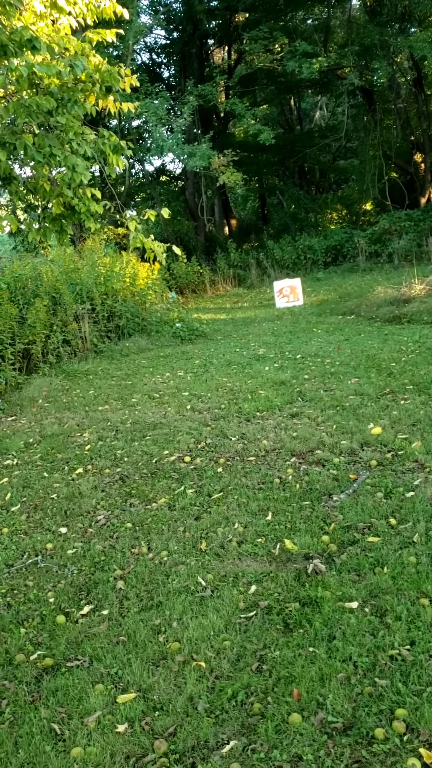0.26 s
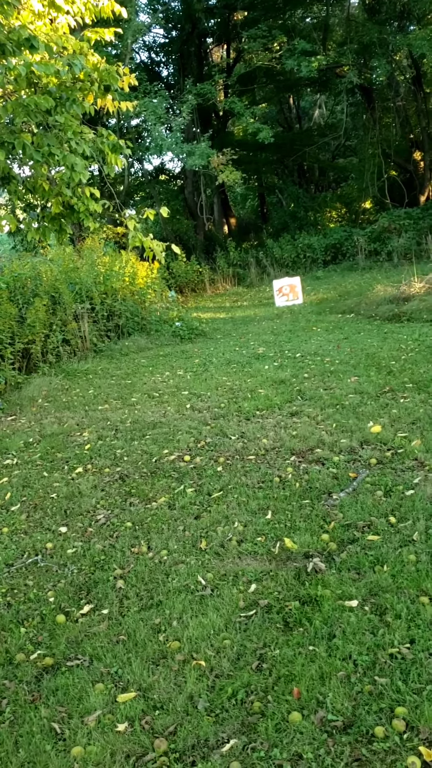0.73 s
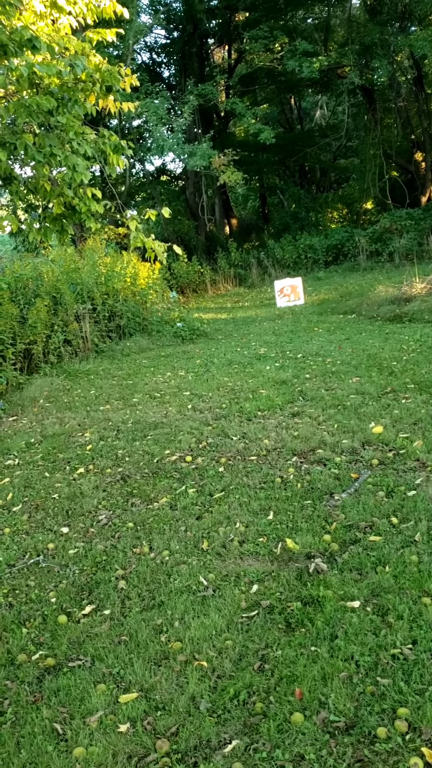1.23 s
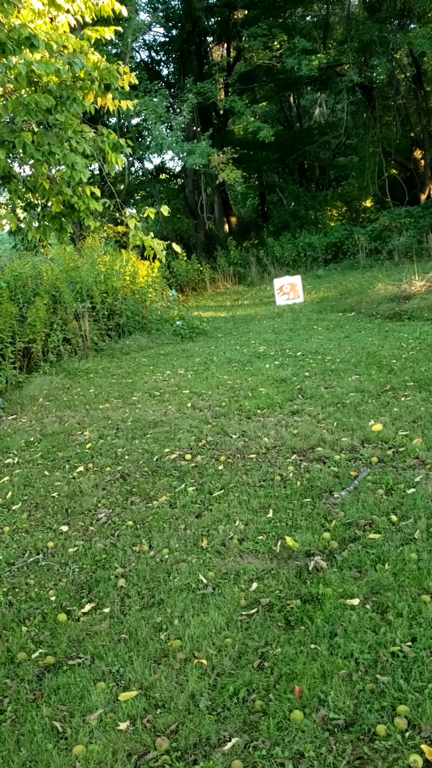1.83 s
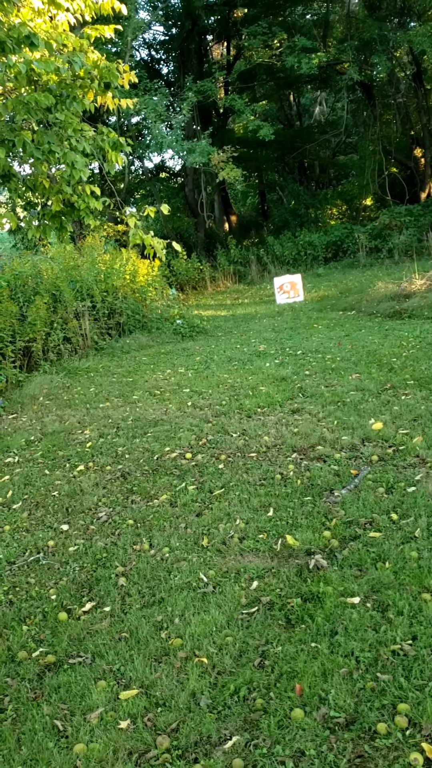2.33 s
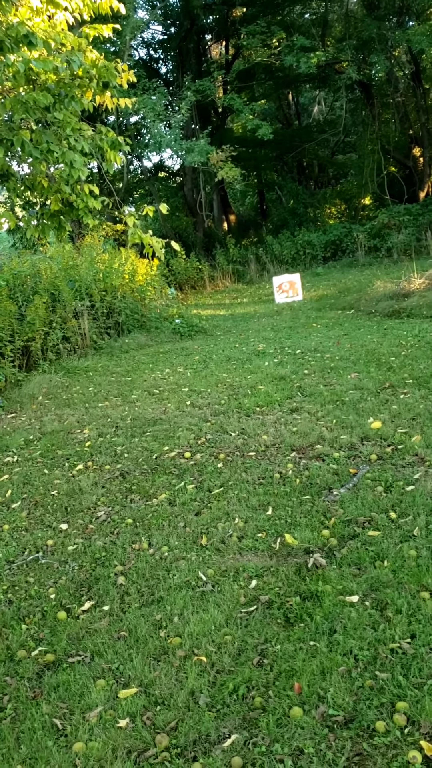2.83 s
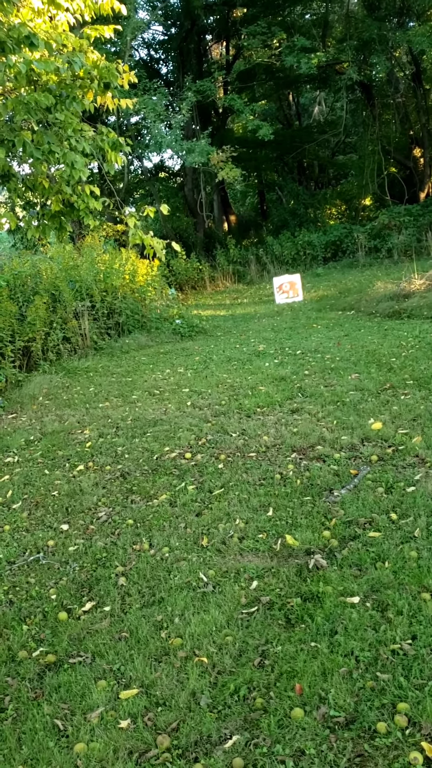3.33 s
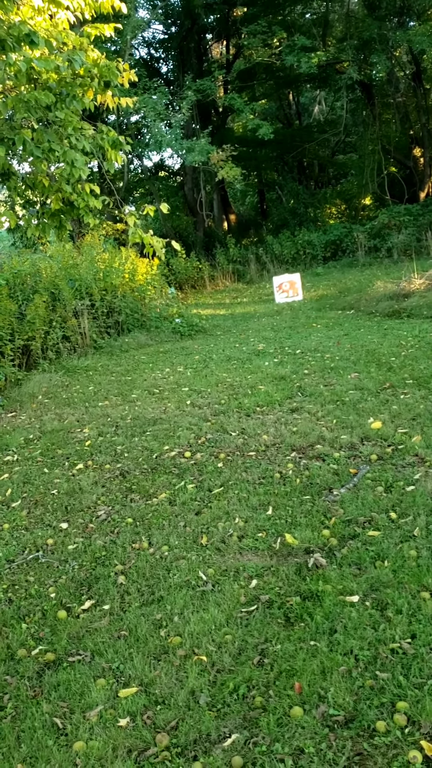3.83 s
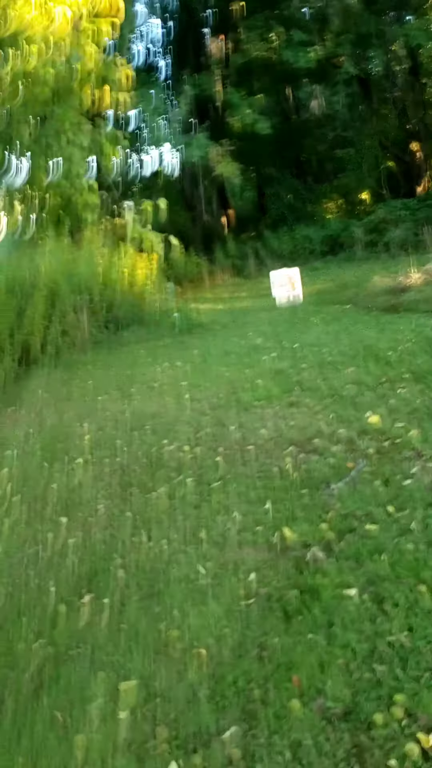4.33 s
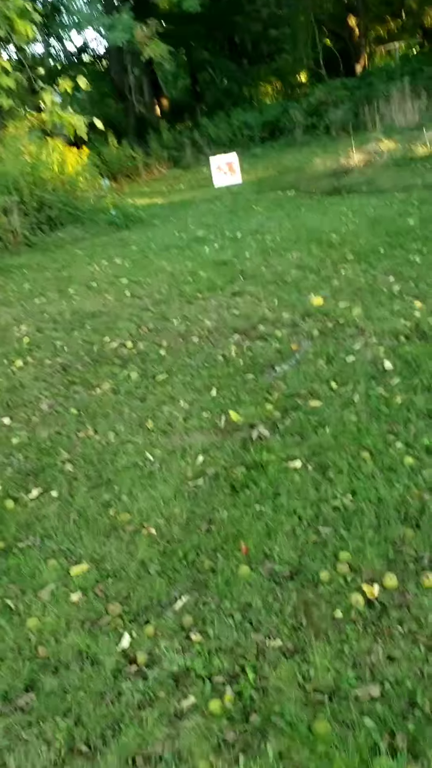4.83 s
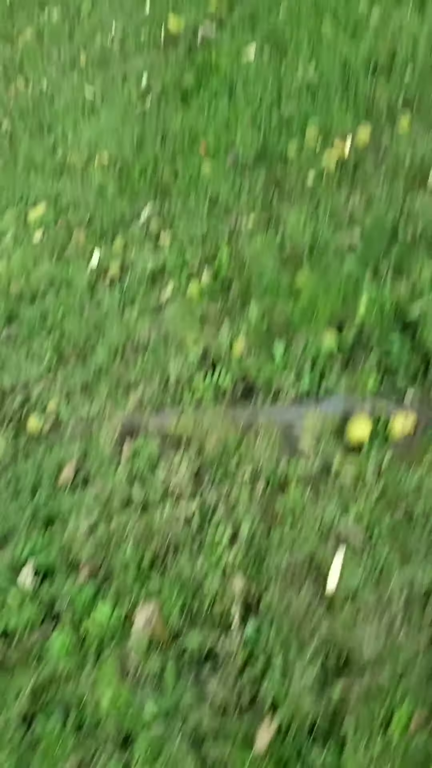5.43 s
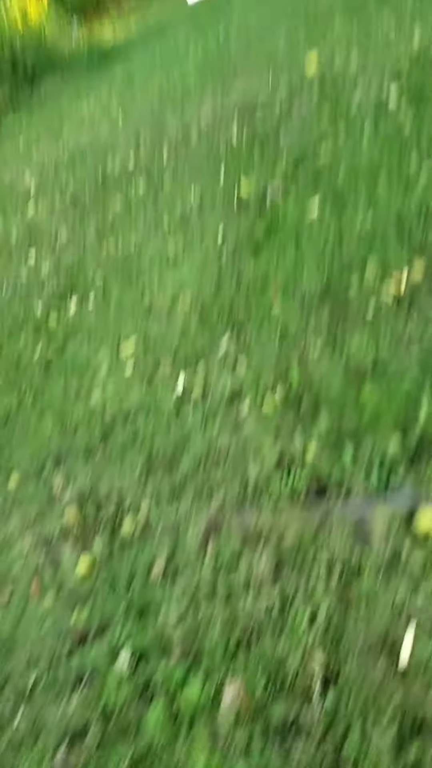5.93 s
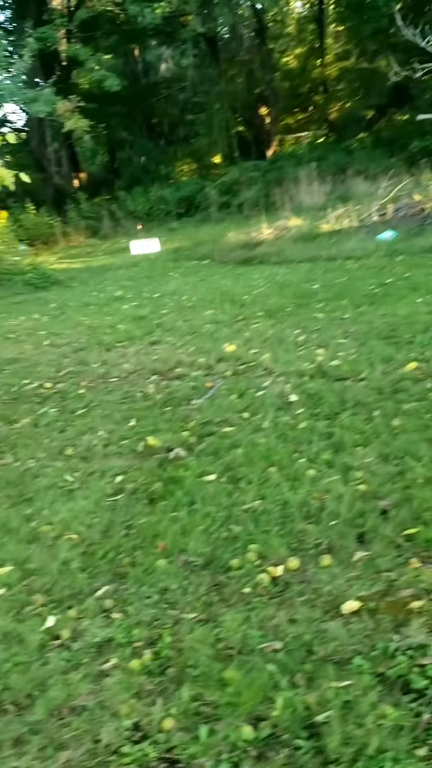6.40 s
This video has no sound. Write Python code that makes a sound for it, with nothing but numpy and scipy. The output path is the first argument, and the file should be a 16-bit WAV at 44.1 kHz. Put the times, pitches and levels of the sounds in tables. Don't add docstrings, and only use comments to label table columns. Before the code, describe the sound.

From 0 to 4.5 seconds, a very quiet lawn by woods: low, uneven distant traffic throbs, a faint engine hum fades away, insects hiss finely, and a cricket trills rapidly and softly near 7.5 kHz. Thin, distant birdlike calls come around 0.3, 2.5 and 3.2. At 4.48 a bow fires right at the microphones: a dense, grainy, overloaded snap of about a tenth of a second with heavy low frame shudder. The arrow whistles barely audibly, then hits a box at 4.76 with a hard knock and a diffuse tree-line echo lasting about half a second. A low string hum and pulsing metallic rattle decay until about 6. The background stays turned down afterward. Dry ticks come at 5.2, 5.8 and 6.5, with a sharper one at 6.63; a soft grass rustle at 5.8. Left is covered, dull and boomy; right is open and bright.

```python
import sys
import numpy as np
from scipy import signal
from scipy.fft import rfft, irfft
from scipy.io import wavfile
from scipy.ndimage import uniform_filter1d

SR = 44100
rng = np.random.default_rng(int(sys.argv[2]) if len(sys.argv) > 2 else 0)


def wav_record(signal):
    frames = np.transpose(np.atleast_2d(signal))
    bounded = np.clip(frames, -1, 1)
    quanta = np.round(bounded * 32767).astype(np.int16)
    wavfile.write(sys.argv[1], SR, quanta)


def magnitude_from_level(level_db):
    exponent = np.asarray(level_db, float) / 20
    return 10 ** exponent


N = 293706
T = np.arange(N) / SR

EDGE_HZ = 14700
RING_S, HIT_S = 4.5309, 4.7564
BOUT_EDGE_S = .04
RING_HZ = [70.95, 70.95, -206.8, 227, 249.7, 284, 361, 657, 143, 156, 178, 298]


def read(points, hz, axis=1):
    table = np.transpose(points)
    return np.interp(np.log(hz + 1), np.log(table[0] + 1), table[axis])


def shaped(x, gain):
    return irfft(rfft(x) * gain(np.fft.rfftfreq(N, 1 / SR)), N)


def causal(points):
    log_gain = np.log(magnitude_from_level(read(points, abs(np.fft.fftfreq(4096, 1 / SR)))))
    return np.fft.ifft(np.exp(np.conj(signal.hilbert(log_gain)))).real[:2048]


def coloured(x, points):
    taps = causal(points)
    return signal.oaconvolve(x, taps / np.linalg.norm(taps))[:N]


def resonate(x, hz, width):
    r = np.exp(-np.pi * width / SR)
    return 2 * signal.lfilter([1 - r], [1, -r * np.exp(2j * np.pi * hz / SR)], x).real


def strike(s, db, rise, t60):
    age = np.maximum(T - s, 0)
    decay = np.exp(-np.log(1000) * np.minimum(age / t60, 4)) * (age < 4 * t60)
    return magnitude_from_level(db) * decay * (1 - np.exp(-age / max(rise, 1e-4)))


def held(start, end, db, edge):
    return magnitude_from_level(db) * (np.tanh((T - start) / edge) - np.tanh((T - end) / edge)) / 2


def drift(rate, depth_db):
    coarse = T[::64]
    slow = sum(np.sin(2 * np.pi * (f * coarse + rng.random())) / np.sqrt(f)
               for f in np.geomspace(.2, rate, num=16))
    return magnitude_from_level(depth_db * np.interp(T, coarse, slow / slow.std()))


def traffic():
    # frequency in Hz, level in dB per Hz.
    open_side = [(20, -90), (45, -66), (62, -51.5), (85, -63), (130, -70), (220, -78), (400, -78.5),
                 (700, -74), (1100, -79.5), (1700, -84), (2400, -94.5), (3000, -105), (3600, -114),
                 (16000, -135)]
    covered_side = [(20, -96), (45, -71), (62, -63), (85, -81), (130, -85), (220, -102), (400, -108),
                    (1100, -111), (1800, -112), (2400, -107), (2900, -116), (5000, -121), (8300, -134),
                    (13000, -120)]
    # frequency in Hz, likeness of left and right [0 to 1].
    likeness = [(60, 0.3), (240, 0.42), (950, 0.25), (3770, 0.05), (15000, 0.029)]
    # centre in seconds, level in dB, half length in seconds.
    swells = [(.2, -39, 0.075), (.48, -43.5, .06), (.72, -44.5, 0.079), (1.33, -46.5, 0.13),
              (1.75, -50.5, 0.17), (2.13, -48, 0.098), (2.34, -44.5, 0.044), (2.72, -40.5, 0.19),
              (3.04, -43, 0.15), (3.52, -46.5, 0.086), (3.76, -42.5, 0.099), (4.17, -44, 0.11),
              (5.59, -39.5, 0.031), (5.92, -42.5, 0.13), (6.18, -39, .06), (6.45, -46.5, 0.11)]
    # start in seconds, level in dB, rise and t60 in seconds.
    shake = (4.5, -22, 0.1, 0.86)
    steady_db = -49.5

    a, b = rng.standard_normal((2, N)) * np.sqrt(SR / 2)
    alike = lambda hz: np.clip(read(likeness, hz), 0, 1)
    mixed = shaped(a, alike) + shaped(b, lambda hz: np.sqrt(1 - alike(hz) ** 2))
    left = shaped(mixed, lambda hz: magnitude_from_level(read(covered_side, hz)) * (hz < EDGE_HZ))
    right = shaped(a, lambda hz: magnitude_from_level(read(open_side, hz)) * (hz < EDGE_HZ))
    both = np.array([left, right])

    low = shaped(both, lambda hz: 1 / (1 + (hz / 100) ** 6))
    low_power = uniform_filter1d(low[1] ** 2, 9000)
    passing = sum(magnitude_from_level(db) * np.exp(-((T - s) / half) ** 2) for s, db, half in swells)
    throb = (magnitude_from_level(steady_db) + passing + strike(*shake)) / np.sqrt(low_power)
    return (both - low) * drift(4.8, 1.0) + low * throb


def engine_hums():
    # start and end in seconds, frequency in Hz, level in dB.
    engines = [
        (-.3, .7, 349, -53.5),
        (-.3, 2.6, 104, -56),
        (5.2, 6.8, 163.5, -50),
    ]
    out = np.zeros(N)
    for s, end, hz, db in engines:
        arc = np.sin(np.pi * np.clip((T - s) / (end - s), 0, 1))
        out += magnitude_from_level(db) * arc * drift(6, 2.0) * np.sin(2 * np.pi * hz * T)
    return magnitude_from_level([[-16], [0]]) * out


def far_calls():
    # start in seconds, frequency in Hz, width in Hz, level in dB, t60 in seconds.
    calls = [
        (.28, 3470, 350, -56, 0.44),
        (2.46, 3340, 100, -57, 0.38),
        (3.2, 3370, 100, -60, 0.45),
        (5.81, 3700, 2000, -46, 0.55),
    ]
    air = rng.standard_normal(N)
    out = np.zeros(N)
    for s, hz, width, db, t60 in calls:
        tone = resonate(resonate(air, hz, width), hz, width) * np.sqrt(2000 / width)
        out += strike(s, db, .047 * t60, t60) * tone
    return out


def insect_chorus():
    # frequency in Hz, level in dB per Hz.
    chorus = [(2500, -125), (3600, -114), (4400, -105), (5200, -99), (6200, -94), (7600, -99), (8100, -107),
              (9000, -108.5), (10200, -105.5), (11500, -101), (14300, -94.5), (14600, -99), (14750, -130)]
    hiss = shaped(rng.standard_normal(N) * np.sqrt(SR / 2), lambda hz: magnitude_from_level(read(chorus, hz)))
    return hiss * magnitude_from_level(.44) * drift(10, 1.0)


def far_cricket():
    # start and end in seconds, level in dB.
    bouts = [
        (-.5, 2.5, -82),
        (2.5, 6.1, -66),
        (6.1, 7.2, -81),
    ]
    buzz = resonate(resonate(rng.standard_normal(N), 7380, 200), 7380, 200)
    trill = (1 + np.cos(2 * np.pi * 47.3 * T)) * buzz
    return sum(held(*bout, BOUT_EDGE_S) for bout in bouts) * trill / trill.std()


def near_cricket():
    # start and end in seconds, level in dB.
    bouts = [
        (-.5, 3.6, -61),
        (3.6, 6.1, -61),
        (6.1, 6.55, -62),
    ]
    chirps_per_s, first_phase = 26.33, .27
    place = (chirps_per_s * T + first_phase + .5) % 1 - .5
    hz = 7590 - 450 * place + 40 * np.log(drift(40, 8.0))
    teeth = 1 + .4 * np.cos(3 * 2 * np.pi * place)
    chirps = np.exp(-(place / .23) ** 2) * teeth * np.sin(2 * np.pi * np.cumsum(hz) / SR)
    return sum(held(*bout, BOUT_EDGE_S) for bout in bouts) * drift(27, 1.7) * chirps


def handling():
    # start in seconds, level in dB, rise and t60 in seconds.
    ticks = [
        (5.189, -29, 0.00023, 0.006),
        (5.408, -62, .0003, .01),
        (5.816, -46, 0.00026, 0.011),
        (6.477, -42, 0.00064, .015),
        (6.484, -42, .0003, .01),
        (6.542, -45, .0003, .01),
        (6.58, -44, .0003, .01),
        (6.6, -54, 0.019, 0.31),
        (6.629, -28.5, .0003, 0.0075),
    ]
    x = sum(strike(*row) for row in ticks) * rng.standard_normal(N)
    return coloured(x, [(1000, -24), (3500, -12), (6000, -8.5), (9000, -12), (12000, 3), (14500, -1),
                        (15300, -26)])


def woods():
    # frequency in Hz, level in dB, t60 in seconds.
    scatter = [(100, -18.5, 0.35), (400, -26, 0.68), (1000, -29, 0.67), (2540, -29, 0.59),
               (4000, -36.5, 0.6), (7000, -41, 0.53), (9000, -51, 0.38), (12000, -41, 0.4),
               (14500, -48, 0.302), (15600, -69.5, .3)]
    hz, t, z = signal.stft(rng.standard_normal(SR), SR, nperseg=256)
    level_db, t60 = read(scatter, hz)[:, None], read(scatter, hz, axis=2)[:, None]
    z = z * magnitude_from_level(level_db - 60 * t / t60)
    back, at = np.zeros(N), round(HIT_S * SR)
    back[at:at + SR] = signal.istft(z, SR, nperseg=256)[1][:SR]
    return 3.1 * back * strike(HIT_S, 0, .0032, 1e3)


def arrow_flight():
    return held(4.6, 4.71, -43.5, .008) * np.sin(2 * np.pi * 1743 * T)


def arrow_hit():
    # start in seconds, frequency in Hz, level in dB, t60 in seconds.
    modes = [(4.7564, 2160, 8, 0.0039), (4.7566, 4454, -5.5, 0.0033), (4.758, 1600, -7, 0.037),
             (4.757, 1300, -6.5, 0.005), (4.7587, 2870, -10.5, 0.013), (4.76, 110, -14, 0.047),
             (4.763, 965, -16, 0.075), (4.763, 664, -24.5, 0.27), (4.762, 373, -14, 0.17),
             (4.7645, 1400, -15, 0.029), (4.797, 2400, -18, 0.017)]
    return sum(strike(s, db, .00011, t60) * np.sin(2 * np.pi * hz * (T - s)) for s, hz, db, t60 in modes)


def rattle():
    # start in seconds, level in dB, rise and t60 in seconds.
    shakes = [
        (4.545, -31.5, .03, 0.75),
        (4.81, -37, .02, .6),
    ]
    # frequency in Hz, width in Hz, level in dB.
    modes = [
        (4600, 2000, -7),
        (6600, 1600, 0),
        (10800, 2400, -3),
        (13000, 2800, 0),
    ]
    cycles = RING_HZ[0] * (T - RING_S) - .25
    size_db = 1.5 * rng.standard_normal(64)[np.floor(cycles).astype(int) % 64]
    ticking = np.exp(-((cycles % 1 - .5) / .045) ** 2) + .04
    puffs = ticking * sum(strike(*row) for row in shakes) * magnitude_from_level(size_db) * rng.standard_normal(N)
    buzz = sum(magnitude_from_level(db) * resonate(resonate(puffs, hz, width), hz, width) for hz, width, db in modes)
    return magnitude_from_level([[0], [-8]]) * 2.3 * buzz


def frame_shudder():
    # start in seconds, frequency in Hz (minus flips the sign), left dB, right dB,
    # time to peak in seconds.
    shudders = [(4.4865, 148, -14, -26, 0.0056), (4.4845, -130, -28.5, -14.5, 0.0061),
                (4.4955, -79, -11, -28.5, 0.0029), (4.5045, 200, 2, -17, .015),
                (4.5177, 275, 2.5, -18, 0.011), (4.508, 417, -11.5, -16.5, .006),
                (4.512, 640.5, -16.5, -14.5, 0.005), (4.51, 345, -18, -18.5, 0.008),
                (4.511, 557.5, -25, -13, 0.008), (4.505, -48, -8, -11.5, .022),
                (4.516, 820, -17.5, -26, .012), (4.51, 108, -12.5, -13, 0.015),
                (4.525, 160, -8.5, -12.5, 0.013), (4.537, 198, -3, -14.5, 0.0058)]
    out = np.zeros((2, N))
    for s, hz, left_db, right_db, peak_s in shudders:
        u = np.maximum(T - s, 0) / peak_s
        swell = (u * np.exp(1 - u)) ** 2
        out += magnitude_from_level([[left_db], [right_db]]) * swell * np.sin(2 * np.pi * hz * (T - s))
    return out


def bow_ring():
    # left dB, right dB, t60 in seconds.
    levels = [(-7, -11.5, .35), (-12.5, -21.5, 1.9), (-17.5, -22, 1.3), (-10.5, -17, 0.72), (-22, -30, .6),
              (-24, -38, .8), (-16.5, -36, .25), (-40, -17, 0.17), (-32, -31, 0.51), (-25, -25, 0.351),
              (-26, -30, .25), (-24, -34, .35)]
    ear_time = T - RING_S - np.array([[0], [-.0016]])
    out = np.zeros((2, N))
    for hz, (left_db, right_db, t60) in zip(RING_HZ, levels):
        tone = np.sin(2 * np.pi * hz * ear_time)
        out += magnitude_from_level([[left_db], [right_db]]) * strike(RING_S, 0, .015, t60) * tone
    return out


def snap():
    # start in seconds, air dB, treble dB over air, camera body dB, t60 in seconds. The last two rows
    slaps = [(4.4826, -21, 5, -32, 0.08), (4.496, -6.5, 8, -9, 0.0052), (4.503, -11.5, 5.5, -25, 0.045),
             (4.5046, -2.5, 0.5, -12, 0.01), (4.5094, -13, -5, -5, 0.015), (4.514, -10, 5.5, -21.5, 0.054),
             (4.5198, -13.5, -4.5, -2, 0.049), (4.528, -9, -10.5, -9.5, 0.05), (4.544, -27, 1, -24, 0.088),
             (4.561, -36.5, -2.5, -30, 0.57), (4.7563, -6.5, 7, -32.5, 0.0064),
             (4.758, -12, 1, -50.5, 0.036)]
    # frequency in Hz, level in dB.
    air_colour = [(30, 7.5), (100, 15), (400, 11.5), (1100, 8), (1700, 7.5), (2900, 1), (3700, -4),
                  (5000, 0.5), (7400, -7.5), (9000, -16), (12000, 2), (14500, -2.5), (15200, -30.5)]
    body_colour = [(100, 14), (500, 20), (1100, 6), (2000, -8), (4000, -12), (6500, -14), (8500, -32),
                   (10000, -26), (12500, -14), (14500, -17), (15200, -40)]
    grains = rng.standard_normal((2, N)) * magnitude_from_level(2.5 * np.minimum(rng.exponential(1, (2, N)), 4))
    grains /= grains.std()
    shapes = np.array([strike(s, 0, .031 * t60, t60) for s, _, _, _, t60 in slaps])
    _, air_db, treble_db, body_db, _ = np.transpose(slaps)
    body, dull, bright = magnitude_from_level([body_db, air_db, air_db + treble_db]) @ shapes
    low = signal.lfilter(*signal.butter(2, 2500, fs=SR), dull * grains[1])
    high = signal.lfilter(*signal.butter(2, 2500, "high", fs=SR), bright * grains[1])
    return np.array([coloured(body * grains[0], body_colour), coloured(low - high, air_colour)])


def mute(x):
    # frequency in Hz, level in dB per Hz.
    floor = [(2000, -125), (2900, -104), (4500, -103), (5500, -106), (7600, -106), (8200, -103),
             (10500, -103), (12000, -108)]
    loud_db = -75
    hz, t, z = signal.stft(x, SR, nperseg=2048, scaling="psd")
    power = (2 * abs(z[:1024]) ** 2).reshape(128, 8, -1).mean(axis=1)
    power = uniform_filter1d(power, size=3, axis=1)
    below = power < magnitude_from_level(2 * read(floor, hz[:1024:8]))[:, None]
    quiet_frame = power[10:].max(axis=0) < magnitude_from_level(2 * loud_db)
    removed = np.zeros_like(z)
    removed[:1024] = z[:1024] * np.repeat(below & quiet_frame, 8, axis=0) * (1 - magnitude_from_level(-32))
    return x - signal.istft(removed, SR, nperseg=2048, scaling="psd")[1][:N]


def gain_control():
    start_db, drop_db, drop_takes_s, sag_db_per_s = -2.5, -10.5, .045, -.53
    age = np.maximum(T - 4.494, 0)
    return magnitude_from_level(start_db + drop_db * (1 - np.exp(-age / drop_takes_s)) + sag_db_per_s * age)


def scene():
    # frequency in Hz, level in dB.
    cover = [(30, -2.5), (200, -2.5), (500, -23), (1000, -23.5), (2400, -38), (5000, -41), (8000, -32),
             (13000, -30)]
    arrow = arrow_flight() + arrow_hit() + woods()
    covered = signal.oaconvolve(arrow, causal(cover))[:N]
    insects = insect_chorus() + far_cricket() + near_cricket()
    air = np.array([covered, arrow + insects + handling() + far_calls()])
    bow = rattle() + frame_shudder() + bow_ring() + snap()
    return traffic() + engine_hums() + air + bow


def band_limit(x):
    return signal.sosfilt(signal.butter(12, 15970, fs=SR, output="sos"), x)


def record(dry):
    hiss = shaped(rng.standard_normal(dry.shape), lambda hz: hz < EDGE_HZ)
    x = np.array([dry[0], mute(dry[1])]) * gain_control() + magnitude_from_level([[-94], [-100]]) * hiss
    overloaded = np.tanh(x * .87) / np.tanh(1.15)
    return band_limit(shaped(overloaded, lambda hz: 1 / (1 + (hz / 15200) ** 40)))


dry = scene()
out = record(dry)
wav_record(out)
```